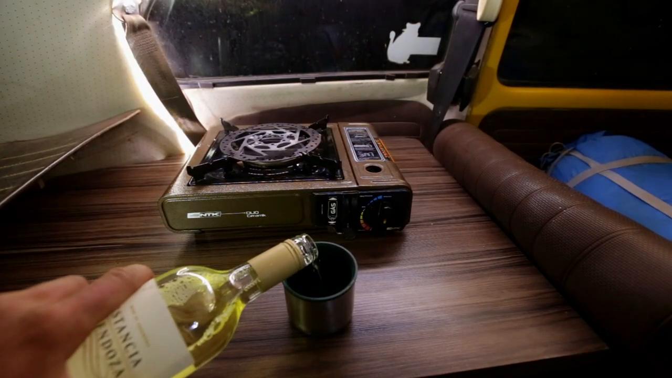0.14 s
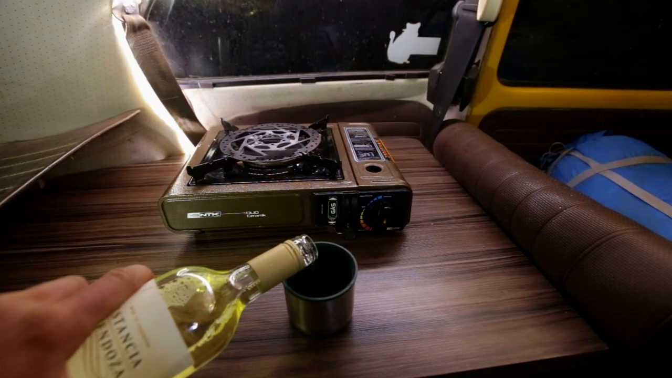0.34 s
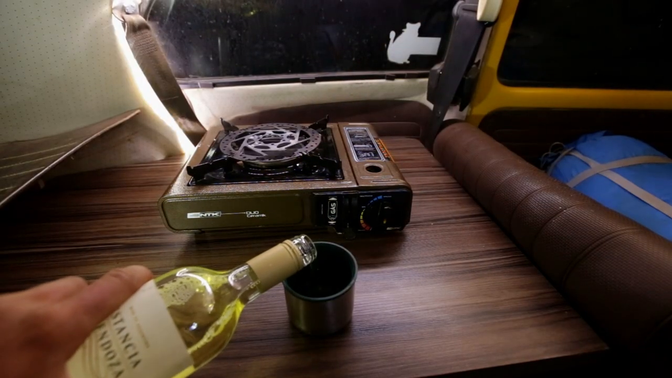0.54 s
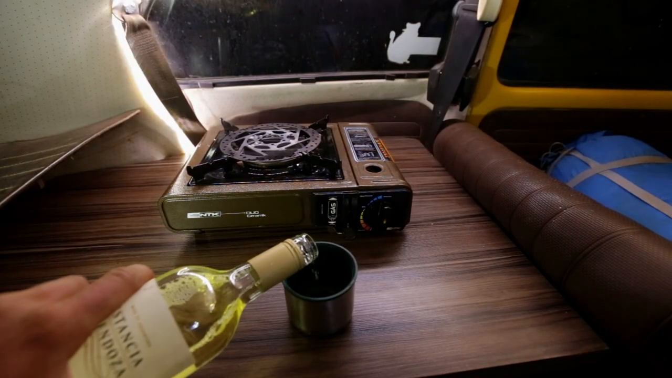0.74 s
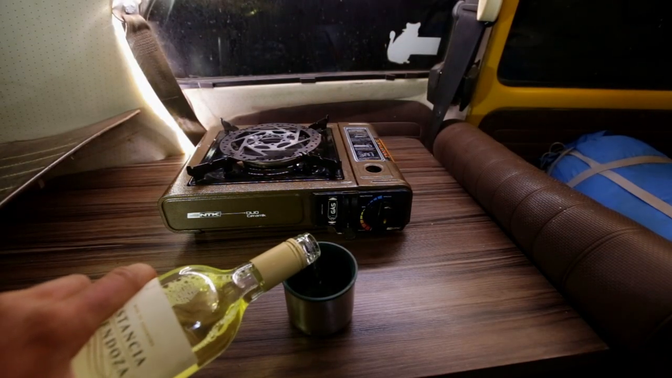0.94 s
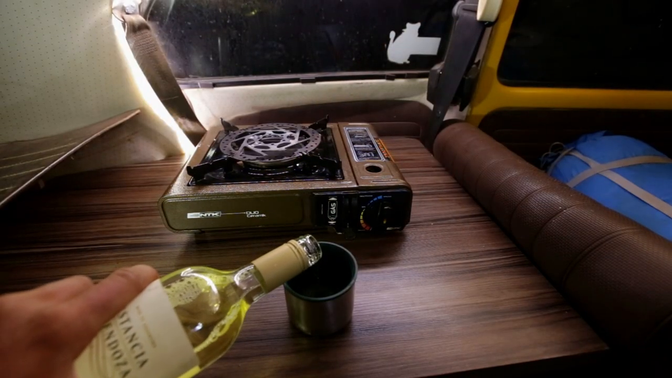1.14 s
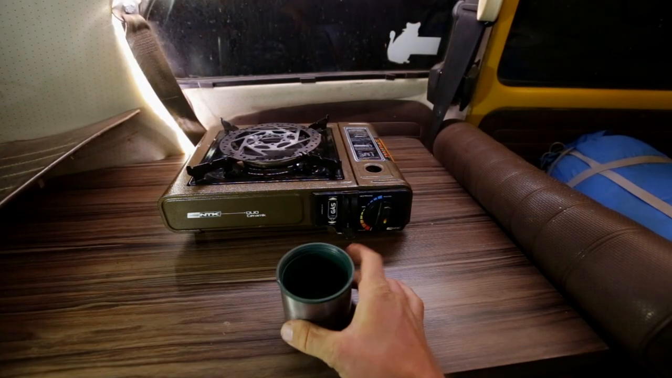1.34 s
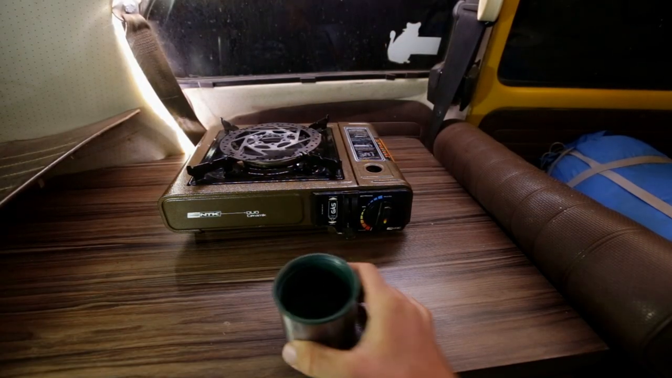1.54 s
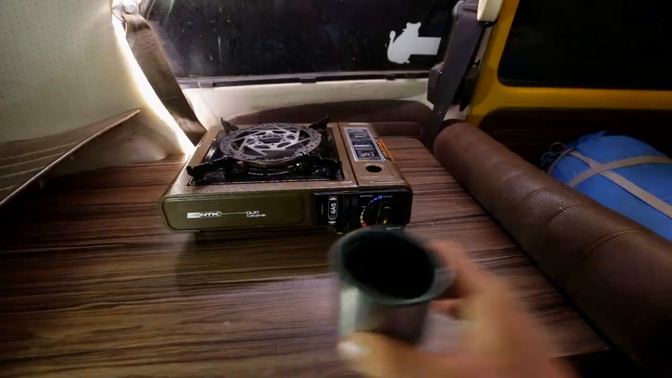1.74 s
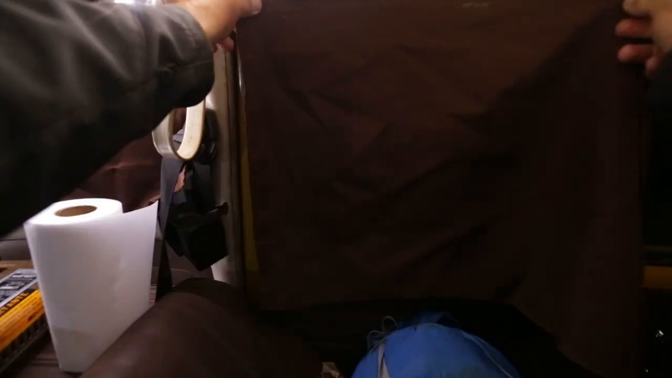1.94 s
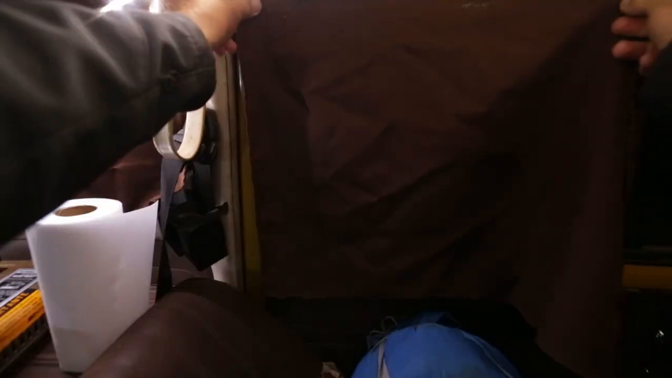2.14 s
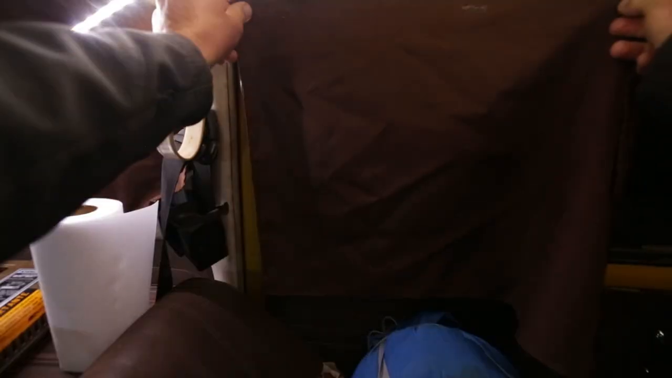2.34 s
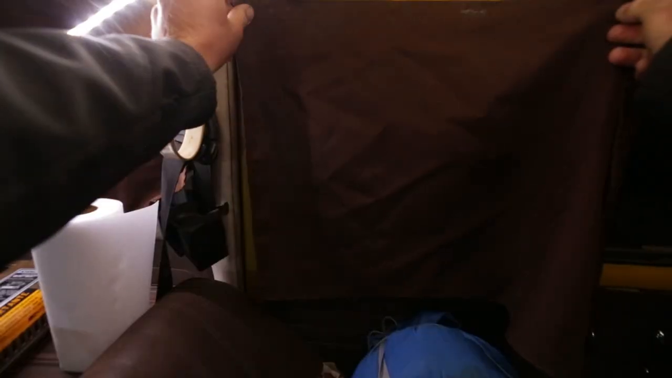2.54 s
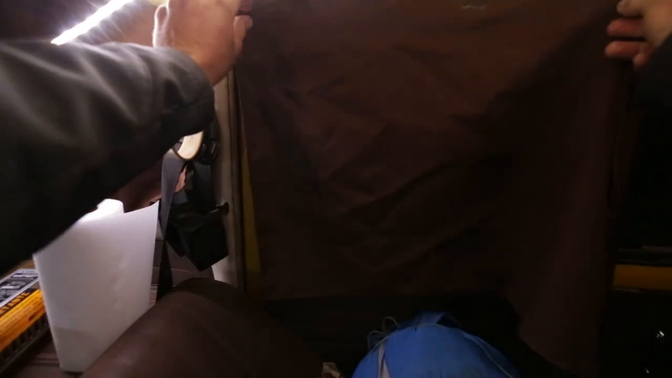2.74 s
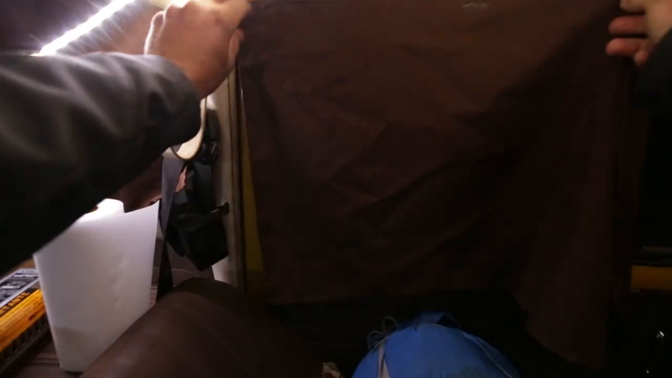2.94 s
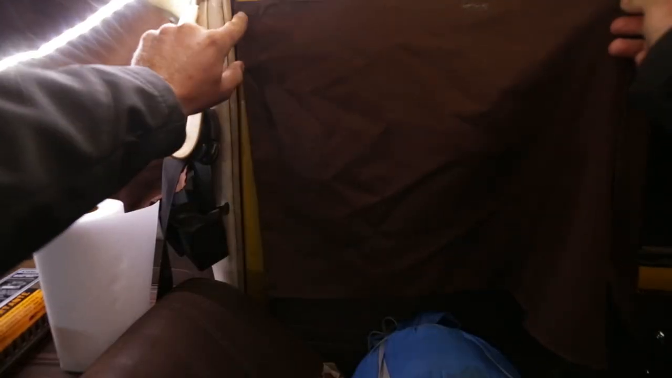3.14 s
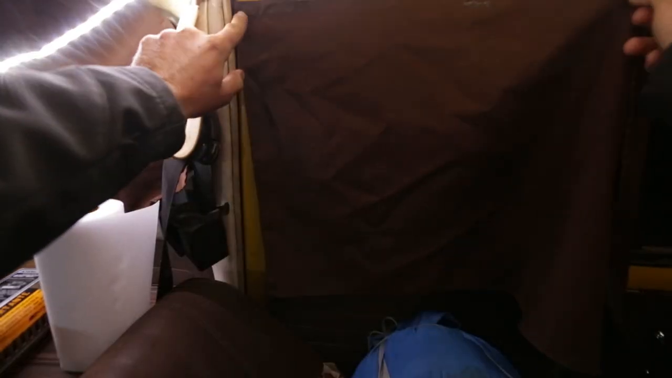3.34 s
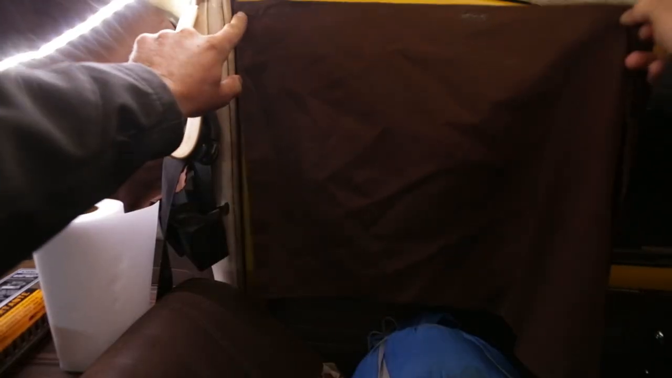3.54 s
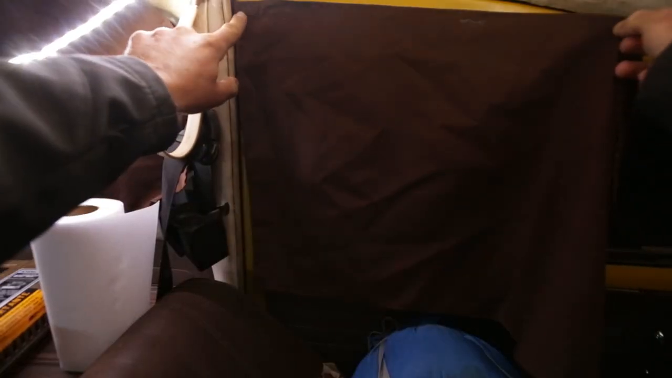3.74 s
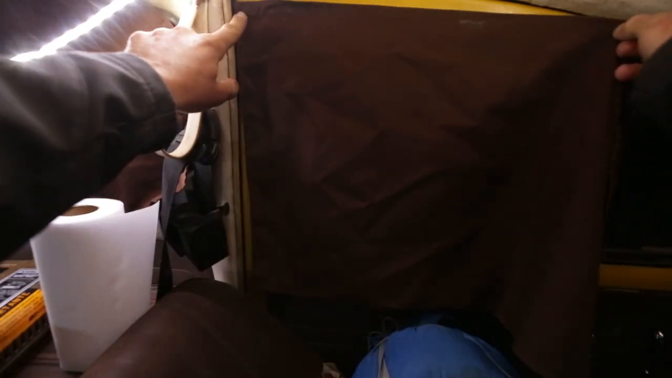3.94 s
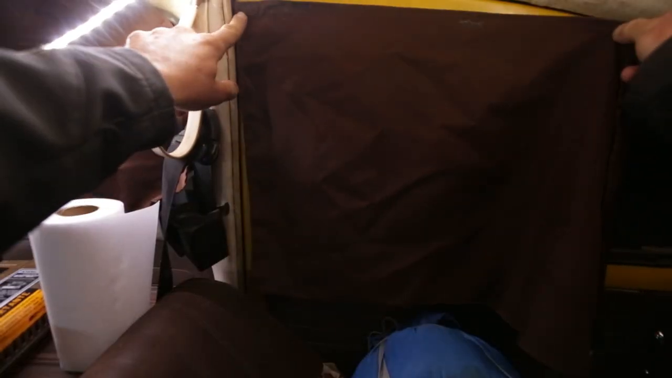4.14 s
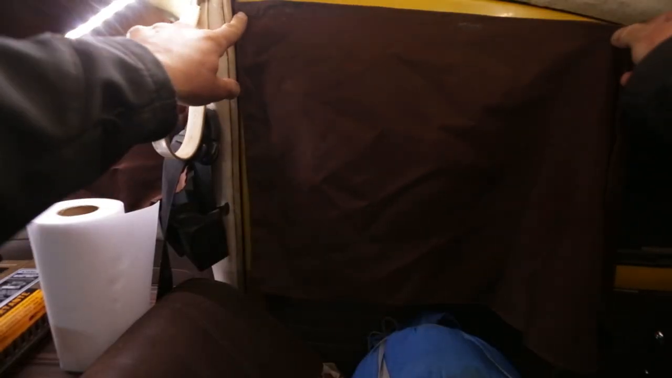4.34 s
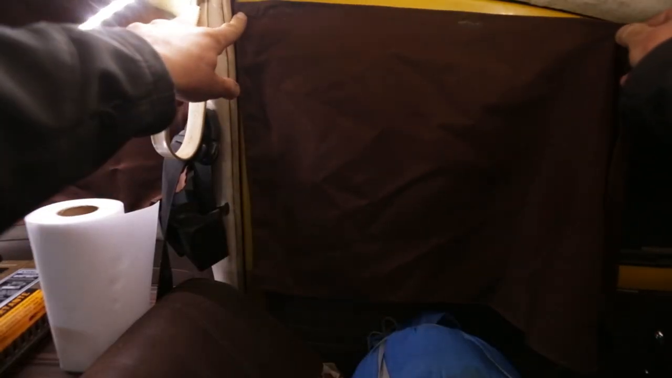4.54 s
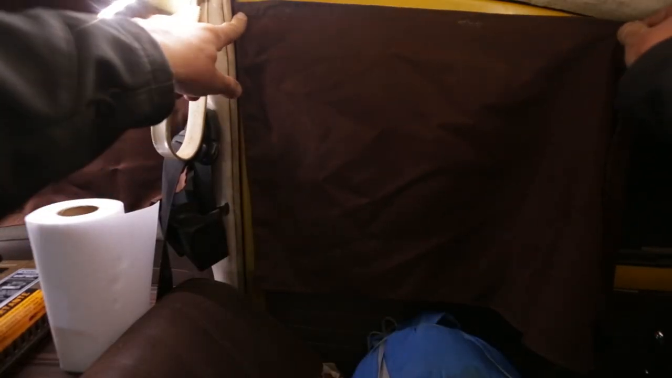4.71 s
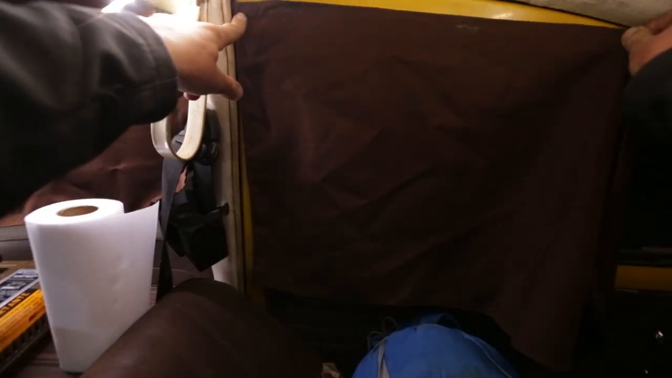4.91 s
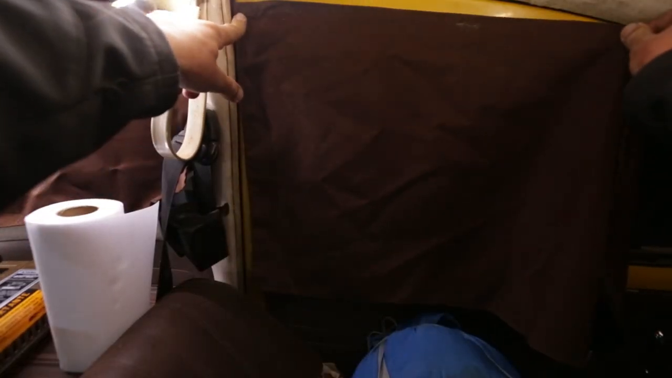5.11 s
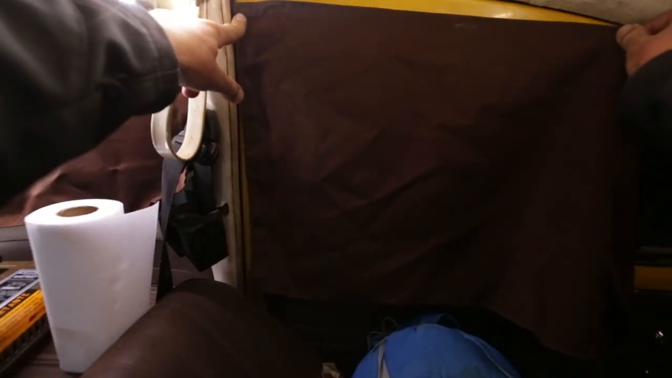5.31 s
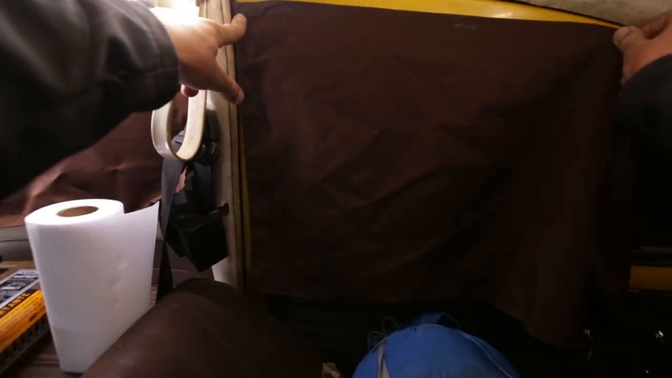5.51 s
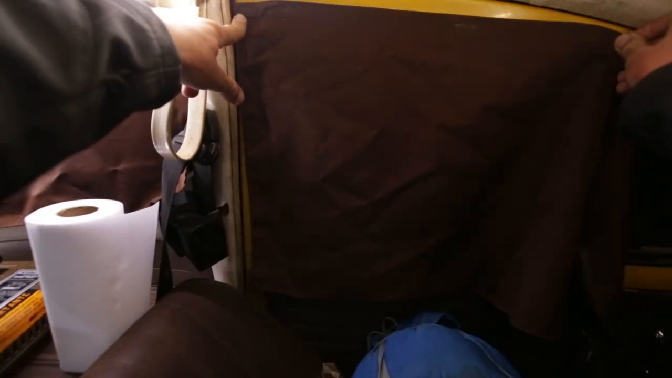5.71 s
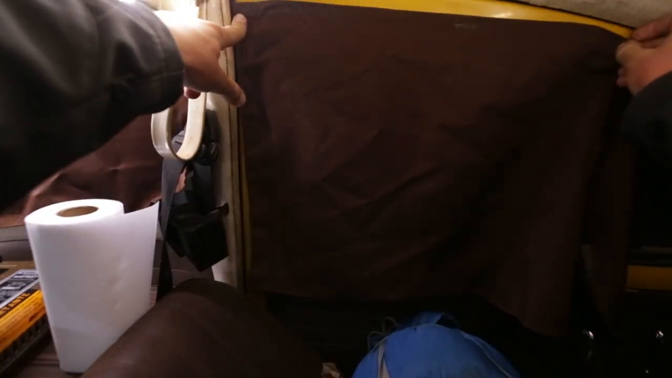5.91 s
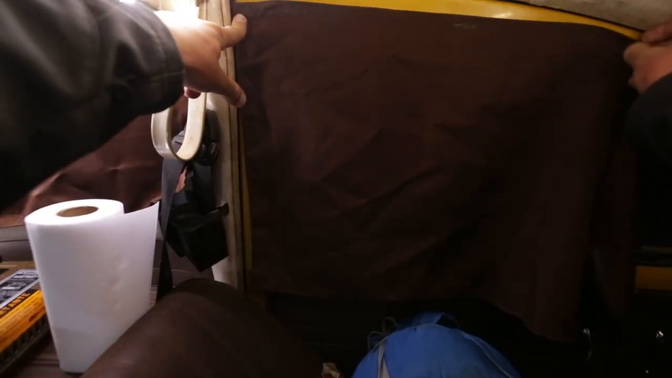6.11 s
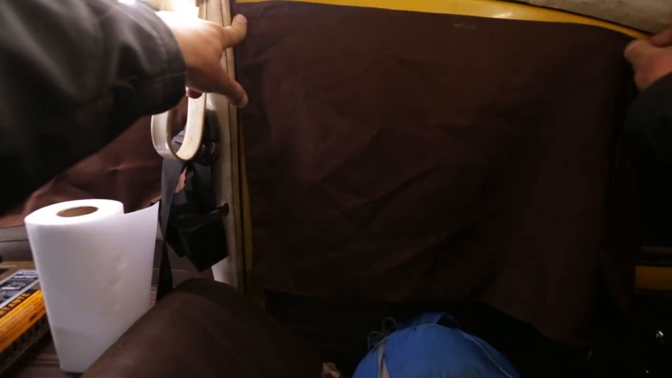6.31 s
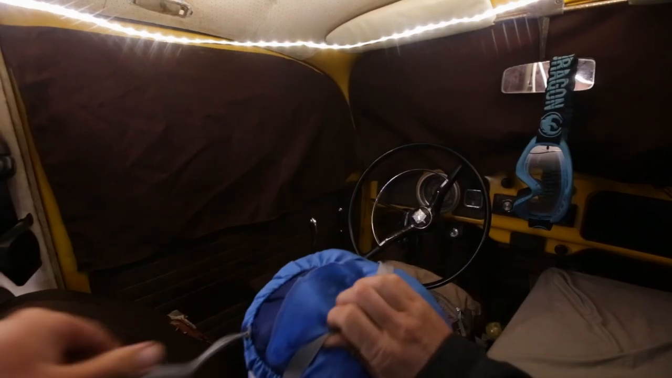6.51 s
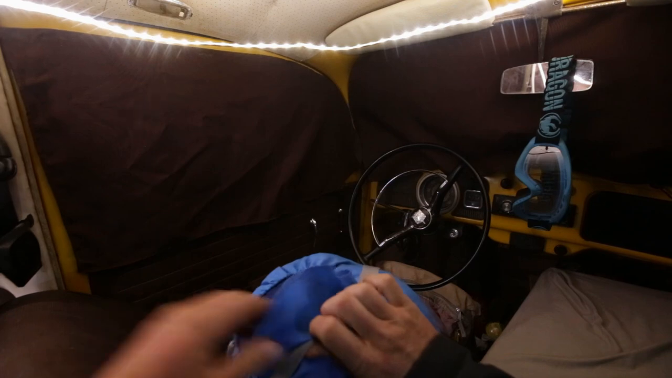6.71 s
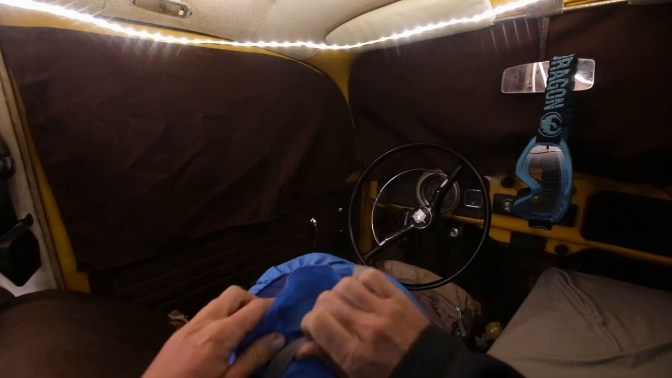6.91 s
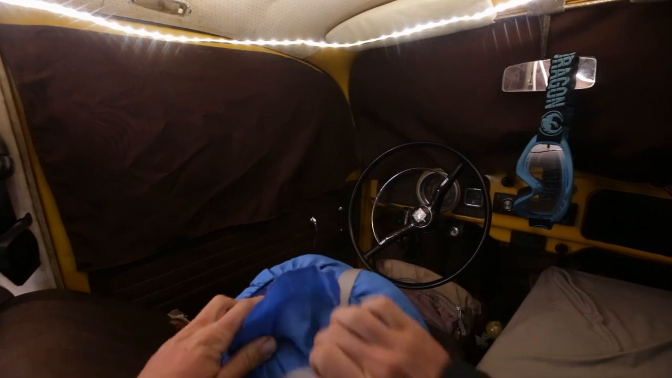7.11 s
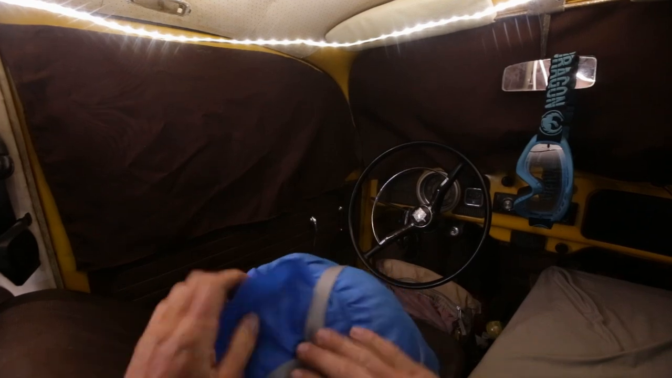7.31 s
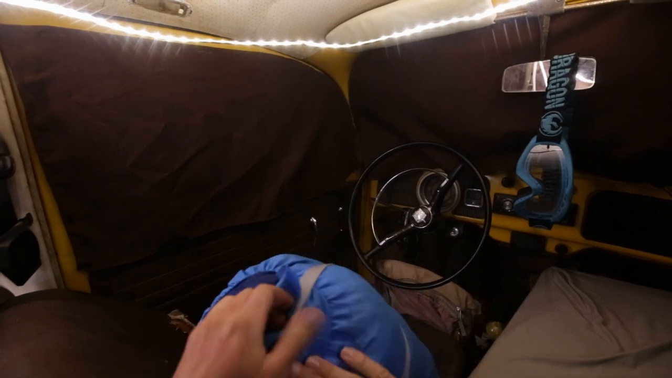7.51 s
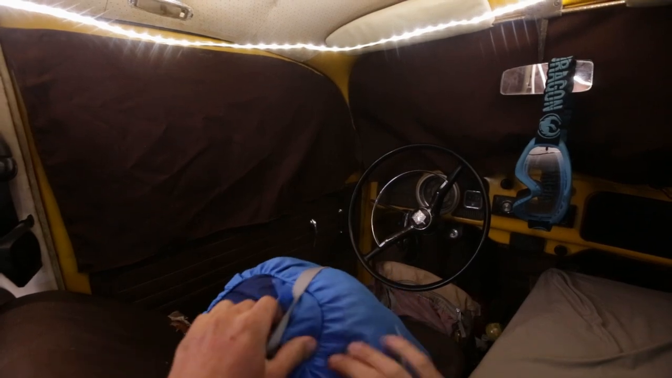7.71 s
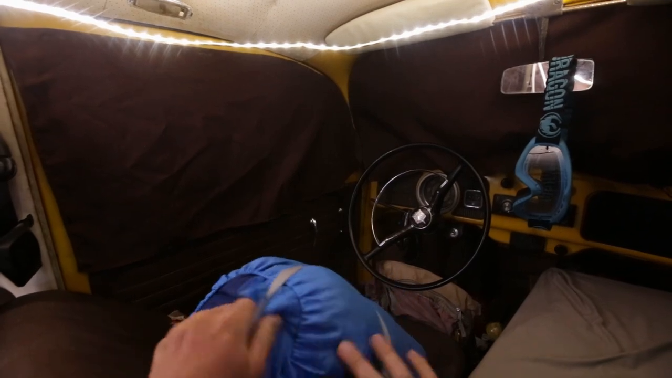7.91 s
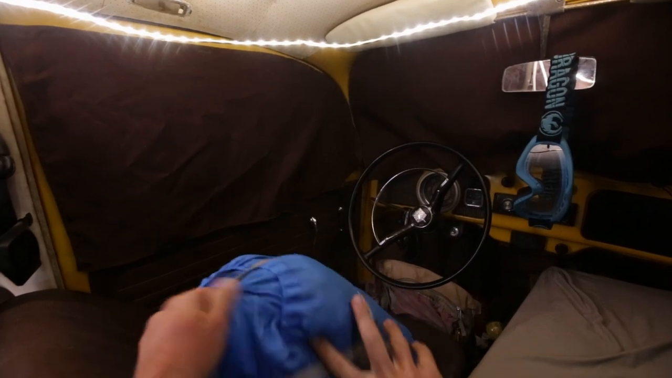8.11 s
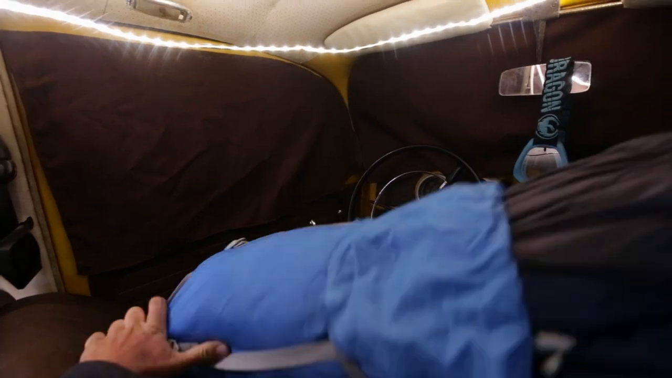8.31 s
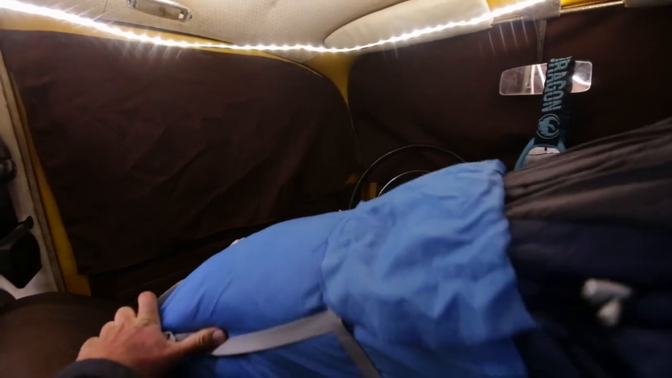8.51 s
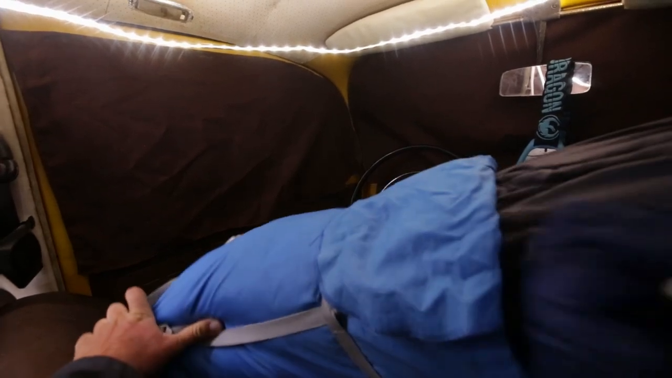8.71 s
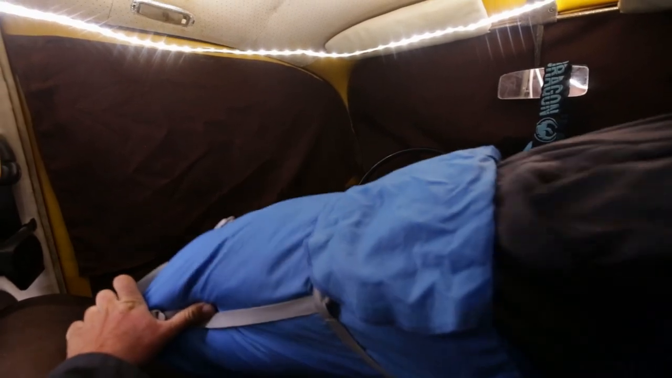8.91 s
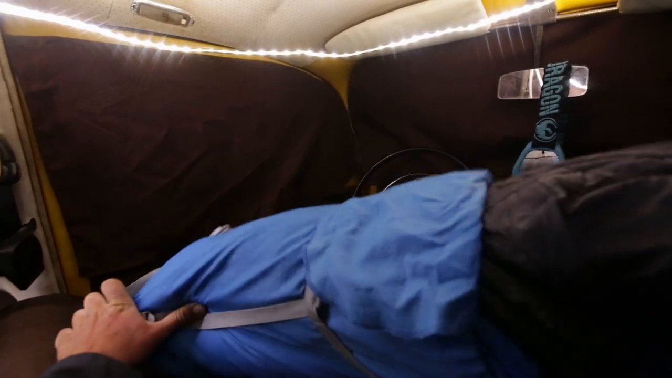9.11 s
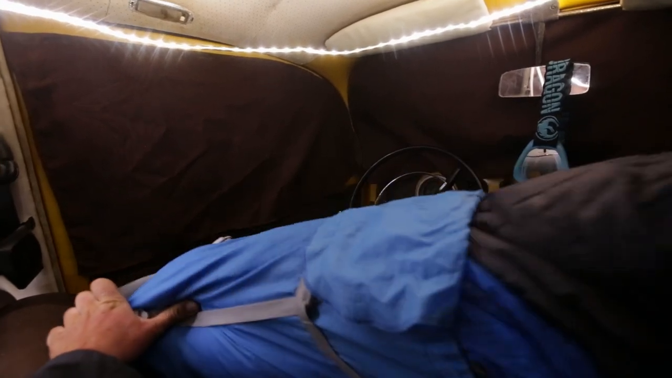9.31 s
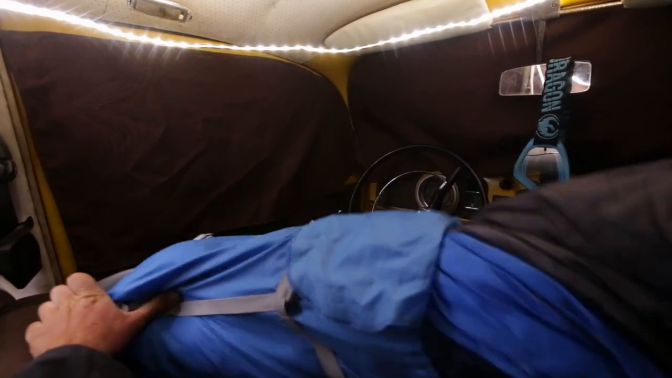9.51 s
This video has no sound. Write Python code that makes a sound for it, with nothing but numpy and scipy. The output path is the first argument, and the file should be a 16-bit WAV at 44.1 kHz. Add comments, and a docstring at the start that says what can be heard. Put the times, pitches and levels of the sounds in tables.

```python
"""Wine, curtain and sleeping bag in a parked car.

The last of a bottle of wine dribbles into a metal cup, ringing it and trapping bubbles; the cup slides
over a table. A cloth curtain is hung with magnets that snap onto the steel body, amid bumps and squeaks.
A sleeping bag rustles out of its nylon sack. The small padded cabin adds close reflections and a short,
low tail, over faint rumble and microphone hiss."""
import sys
import numpy as np
from scipy import signal
from scipy.fft import rfft, irfft, next_fast_len
from scipy.io import wavfile
from scipy.ndimage import uniform_filter1d

SR = 44100
rng = np.random.default_rng(int(sys.argv[2]) if len(sys.argv) > 2 else 0)


def digitize_waveform(pressure):
    """Quantize a signal to 16-bit integers and store it at the path in sys.argv[1].

    Rows of a 2-D input are taken as channels; values are limited to [-1, 1].
    """
    field = np.atleast_2d(pressure).T
    bounded = np.clip(field, -1, 1)
    quanta = np.round(bounded * 32767).astype(np.int16)
    wavfile.write(sys.argv[1], SR, quanta)


N = 421155
TIME_S = np.arange(N) / SR
RING_S = np.arange(SR // 2) / SR  # time since an onset

# Larger drops. Each row: start in seconds, impact in dB, bubble in Hz, bubble in dB, cup air in dB.
DROPS = [(0.027, -66, 3660, -57, -59), (0.08, -66, 2520, -61, -74), (0.095, -66, 2910, -57, -73),
         (0.168, -59, 2930, -56, -59), (0.212, -50, 965, -56.5, -62), (0.3, -49, 2600, -55, -48.5),
         (0.339, -56, 3820, -51.5, -51), (0.356, -45.5, 3200, -54, -55), (0.391, -70, 3600, -54, -64),
         (0.408, -50.5, 2120, -53, -42.5), (0.442, -63, 2840, -52.5, -63), (0.458, -53, 2040, -60, -53),
         (0.487, -58, 2540, -55, -64), (0.526, -55.5, 2650, -63, -54), (0.55, -56, 2300, -55.5, -50),
         (0.651, -51, 2450, -50.5, -47), (0.858, -57, 2710, -56.5, -60), (0.877, -55.5, 1940, -61, -48),
         (0.889, -51, 2390, -58.5, -47), (0.932, -64, 1940, -55.5, -61), (0.986, -61, 1500, -64, -58),
         (1.007, -58, 2340, -62, -64), (1.066, -54.5, 1840, -73, -57), (1.194, -58, 1830, -64, -52),
         (1.209, -61, 2350, -60, -50.5), (1.232, -64, 2650, -68, -55), (1.244, -62, 1960, -60, -56)]
# Magnets meeting steel. Each row: start in seconds, level in dB, hardness 0-1, struck spot in Hz,
# its share in dB, ping in Hz, its share in dB.
MAGNET_HITS = [(1.9027, -37.5, .15, 880, -0.5, 2450, -18.5), (1.9171, -17, 0.4, 671, 1, 2470, -4),
               (3.8615, -44.5, .75, 930, 2, 2984, 5), (3.8752, -40, .85, 1020, 1, 2410, 7),
               (3.8859, -21.5, 0.99, 634, 0, 5070, 2.5), (5.2749, -36.5, 0.45, 990, -8, 4500, -14),
               (5.279, -27.5, 0.08, 970, 3.5, 1550, -17.5), (5.3143, -33.5, .75, 905, -6, 3900, -14.5),
               (5.317, -22.5, 0, 900, 10.5, 1570, -12)]
# Hands on trim and bag, folds snapping. Each row: start in seconds, then tap, thud and tick in dB.
BUMPS = [(2.207, -53, -45.5, -78), (2.458, -51, -80, -53), (2.781, -55, -54, -37), (2.889, -61, -78, -53.5),
         (4.155, -44.5, -42.5, -49), (4.76, -64, -82, -49), (4.832, -51.5, -84, -48),
         (5.469, -70, -56, -75), (5.678, -48.5, -76, -52), (5.887, -45.5, -79, -75),
         (6.04, -54.5, -80, -55.5), (6.309, -46, -71, -54), (6.331, -40, -56, -41.5),
         (6.356, -50, -62, -43), (6.381, -36.5, -70, -38), (6.459, -46, -42, -48.5), (6.564, -46, -59, -47),
         (6.68, -34, -39.5, -44.5), (6.698, -33, -52, -52), (6.811, -39, -48, -61),
         (6.914, -41.5, -58, -57), (6.947, -44, -54, -39.5), (7.116, -47, -65, -46), (7.431, -47, -57, -59),
         (7.578, -45.5, -54, -62), (7.946, -67, -58, -47), (8.199, -36.5, -48, -36.5),
         (8.349, -37, -58, -50)]
# Squeaking rubs. Each row: start in seconds, level in dB, pitch in Hz, roughness 0-1.
SQUEAKS = [(2.423, -46.5, 1096, 0.14), (6.610, -50.5, 840, 0.4), (6.626, -48.5, 800, 0.65),
           (6.911, -51, 763, 0.51)]
# Tension of the sack. Each row: time in seconds, tautness 0-1.
SACK_TENSION = [(7.6, 0), (8.15, 0.13), (8.35, 0.74)]
# One long pull of the bag. Each row: time in seconds, rustle in dB, fizz in dB.
BAG_PULL = [(8.26, -48, -71), (8.36, -41, -66), (8.6, -43, -68), (8.64, -41, -64), (8.758, -44, -83),
            (8.916, -41, -66), (9.208, -42.5, -69), (9.488, -39, -58), (9.55, -39.5, -62)]

# Movements. Each row: start in seconds, length in seconds, relative level in dB, swell in dB.
TRICKLE_SPURTS = [(0, 0.15, -63, 4), (.25, 0.3, -65.5, -13), (.52, 0.19, -72, 11), (.83, 0.25, -68.5, 3),
                  (1.17, 0.16, -66.5, -3)]
CUP_PUSHES = [(1.305, .11, -59.5, -9), (1.462, 0.083, -52.5, -4)]
BODY_BOOMS = [(2.2, 0.013, -51, -7), (2.785, 0.14, -68.5, -18), (3.04, .02, -65.5, -4),
              (3.14, .15, -80, -8), (5.3, 0.029, -57, -7), (6.31, 0.09, -54.5, 6)]
CURTAIN_STROKES = [(2.21, 0.16, -71, -8), (2.38, 0.26, -71.5, -3.5), (2.72, 0.16, -67, 0),
                   (3.11, 0.16, -69, -11.5), (4.41, 0.044, -73, 0), (4.52, .07, -74, -6),
                   (4.75, 0.091, -67, 3), (5.69, 0.34, -71.5, -0.5), (6.06, 0.076, -65.5, 2)]
SACK_STROKES = [(6.21, .15, -58, 18), (6.42, 0.1, -61, -6), (6.54, 0.059, -57, -2), (6.625, .05, -54.5, -3),
                (6.72, 0.069, -56, 13.5), (6.83, 0.15, -53.5, 0), (7.0, 0.22, -49, 3.5),
                (7.27, 0.11, -53, 8), (7.415, 0.12, -53, -10.5), (7.545, 0.044, -51.5, -2.5),
                (7.63, .14, -53, 13), (7.78, .15, -52.5, 0), (7.935, 0.27, -51, -4.5), (8.18, .14, -49, -3)]  # hands working the sack open
BAG_CATCHES = [(8.31, 0.047, -54, -11), (8.64, 0.029, -56, -1), (9.0, .07, -57, -14),
               (9.225, 0.027, -55, 16)]  # bag catching in the sack's mouth

# Resonances. Each row: frequency in Hz, width in Hz, level in dB.
CUP_MODES = [(185.6, 10, 4.5), (219.4, 15, 1), (541, 32, 2.5), (728, 32, -8), (930, 30, -6.5),
             (1430, 200, -4.5), (1900, 35, -30), (2330, 250, -15), (2600, 69, -22), (3320, 130, -14),
             (3690, 60, -13)]  # cup and table
STEEL_MODES = [(615, 81, 0), (970, 110, 0.5), (1180, 70, -3.5), (1350, 90, -5), (1590, 78, -6.5),
               (1830, 15, -19), (2140, 60, -10.5), (2300, 70, -9), (2490, 65, -4.5), (2990, 44, -18),
               (3360, 120, -11), (3980, 68, -18.5), (4280, 100, -19), (5130, 150, -23.5), (6090, 91, -27.5),
               (6630, 180, -31), (8296, 110, -28), (10600, 110, -28.5)]
# Slow ring of the wide panels. Each row: frequency in Hz, level in dB, T60 in seconds.
PANEL_MODES = [(241, -12.5, 0.27), (330, -7.5, 0.37), (386, -1.5, .24), (450, -7.5, .24), (484, -6.5, 0.24),
               (538, -7, 0.12), (598, -4.5, .16), (689, -4.5, .14), (824, -8.5, .17), (887, -8, 0.18),
               (1010, -9, .14)]
# Cabin decay. Each row: frequency in Hz, T60 in seconds.
CABIN_T60_S = [(100, .25), (300, .26), (420, 0.17), (700, 0.16), (1800, 0.066), (5000, 0.024),
               (15000, 0.18)]

# Spectra. Each row: frequency in Hz, relative level in dB.
FLOOR_MID_SPECTRUM = [(12, -30), (20, -9.5), (148, -17.5), (185, -12), (225, -17), (342, -20), (372, -17),
                      (597, -18), (788, -16), (1230, -19), (2400, -21), (2610, -21), (6190, -25),
                      (15500, -25.5)]  # air and hiss common to both sides
FLOOR_SIDE_SPECTRUM = [(20, 0.5), (100, -3.5), (300, -7.5), (700, -10), (1500, -14.5), (4000, -11),
                       (9000, -10.5), (15500, -9.5)]  # the part that differs between sides
SPRAY_SPECTRUM = [(1200, 3), (1700, 4), (1950, 0), (2800, 10), (3700, -1), (4300, -17), (5300, -1),
                  (6500, -12)]
SLIDE_SPECTRUM = [(65, -55), (110, -32), (199, 3), (366, -20), (553, -4), (649, -22), (777, -13.5),
                  (1020, -9), (1090, -32), (1310, -4), (1650, -32), (1940, -19), (3510, -22), (8000, -40),
                  (10400, -60), (17600, -120)]
CRACK_SPECTRUM = [(150, -16.5), (500, -4.5), (1200, 4.5), (1900, -6.5), (2600, -4.5), (5200, -14.5),
                  (6500, -18), (11000, -21.5), (16000, -26.5)]
BOOM_SPECTRUM = [(25, -5), (50, -13), (90, -3.5), (122, 11), (160, -12.5), (260, -5)]
CURTAIN_SPECTRUM = [(59, -35.5), (100, -5), (453, -9.5), (973, -4), (1270, -12), (2410, -7), (3380, -12.5),
                    (4030, -16), (4490, -23), (7000, -22), (9100, -31), (15400, -120)]
SLACK_SPECTRUM = [(600, -6.5), (770, -1), (950, 4), (1350, -0.5), (2400, 0), (3300, -1), (4300, -13),
                  (5100, -7.5), (5800, -19), (6500, -14), (7300, -25), (9000, -27.5)]  # slack nylon: hollow
TAUT_SPECTRUM = [(600, -7.5), (800, -2.5), (1050, -2.5), (1300, -2), (2450, -2.5), (3300, -6.5),
                 (4300, -10), (5500, -14.5), (7000, -21.5), (9000, -28)]  # taut nylon: even
HUM_SPECTRUM = [(50, -34), (90, -14), (125, -8.5), (160, -10.5), (250, -8), (330, -6), (440, 0.5),
                (560, -0.5), (720, -17), (1000, -37)]
FIZZ_SPECTRUM = [(5000, -19), (7500, -2), (10000, -9), (12500, -5), (16000, -13)]


def undb(db):
    """Decibels to gain."""
    return 10 ** (np.asarray(db) / 20)


def unit(x):
    """Scale to rms 1."""
    return x / np.sqrt(np.mean(x ** 2))


def blow(x):
    """Scale a short sound to the energy of 10 ms at rms 1."""
    return x / np.sqrt(np.sum(x ** 2) / (SR / 100))


def curve(table, column):
    """Gain from a dB column: silent before the first row, falling 100 dB/s after the last."""
    rows = np.array(table)
    fall_db = np.maximum(TIME_S - rows[-1, 0], 0) * 100
    return undb(np.interp(TIME_S, rows[:, 0], rows[:, column], left=-np.inf) - fall_db)


def over_hz(hz, points):
    """Interpolate (Hz, value) points on a log frequency axis."""
    points_hz, values = np.transpose(points)
    return np.interp(np.log(hz + 1e-9), np.log(points_hz), values)


def colour(x, spectrum):
    """Filter by a spectrum, rolled off beyond its ends; rms 1."""
    size = next_fast_len(len(x))
    hz = np.arange(size // 2 + 1) * SR / size + 0.0015
    low_cut = 1 + (spectrum[0][0] / hz / 1.15) ** 12
    high_cut = 1 + (hz / spectrum[-1][0] / 1.15) ** 12
    gain = undb(over_hz(hz, spectrum)) / np.sqrt(low_cut * high_cut)
    return unit(irfft(rfft(x, size) * gain, size)[:len(x)])


def band(x, low_hz, high_hz, order=2):
    """Causal band-pass."""
    edges_hz = [low_hz, min(high_hz, .48 * SR)]
    return signal.sosfilt(signal.butter(order, edges_hz, "band", fs=SR, output="sos"), x)


def fade(t60_s):
    """Decay by 60 dB in t60_s."""
    return np.exp(-np.log(1000) * RING_S / t60_s)


def noise():
    """Half a second of white noise."""
    return rng.standard_normal(len(RING_S))


def sine(hz, phase_turns=0):
    """Half a second of steady tone."""
    return np.sin(2 * np.pi * (hz * RING_S + phase_turns))


def modes(table):
    """Struck resonances, neighbours in opposite sign."""
    return blow(sum((-1) ** k * undb(db) * width_hz * np.exp(-np.pi * width_hz * RING_S) * sine(hz)
                    for k, (hz, width_hz, db) in enumerate(table)))


def add(out, start_s, sound):
    """Mix a sound in at start_s."""
    start = max(int(start_s * SR), 0)
    out[start:start + len(sound)] += sound[:max(N - start, 0)]


def grains(per_s, spread_db):
    """Dense random impulses of uneven size; rms 1."""
    size = undb(spread_db * np.minimum(rng.exponential(size=N), 5))
    return unit((rng.random(N) < per_s / SR) * size * rng.standard_normal(N))


def waver(per_s, depth_db):
    """Randomly wandering gain."""
    hold = int(SR / per_s)
    steps = np.repeat(rng.standard_normal(N // hold + 1), hold)
    return undb(depth_db * uniform_filter1d(steps, hold)[:N])


def strokes(table, attack_s, release_s):
    """Gain of separate movements: each sets in, swells or eases, and dies away."""
    power = np.zeros(N)
    for start_s, length_s, db, swell_db in table:
        progress = np.minimum(RING_S / length_s, 1)
        attack = np.minimum(RING_S / attack_s, 1)
        release = np.exp(-np.maximum(RING_S - length_s, 0) / release_s)
        add(power, start_s, (undb(db + swell_db * (progress - .5)) * attack * release) ** 2)
    return np.sqrt(power)


def noise_floor():
    """Faint air rumble and microphone hiss, in stereo."""
    mid = undb(-67.5) * colour(rng.standard_normal(N), FLOOR_MID_SPECTRUM)
    side = undb(-70.5) * colour(rng.standard_normal(N), FLOOR_SIDE_SPECTRUM)
    return np.array([mid + side, mid - side])


def bubble(hz, cycles, rise):
    """A trapped bubble rings briefly, rising in pitch as it nears the surface."""
    life_s = cycles / hz
    pitch_hz = hz * (1 + rise * np.minimum(RING_S / life_s - .15, 1))
    return blow(np.sin(2 * np.pi * np.cumsum(pitch_hz) / SR) * fade(life_s))


def wine_trickle(pour_s=1.3, bubble_count=110):
    """Fine spurts tick with spray and tiny bubbles and keep the cup ringing."""
    bubbles = np.zeros(N)
    for when, pitch, faintness in rng.random((bubble_count, 3)):
        hz = 1900 * 2.9 ** (pitch ** 1.5)
        add(bubbles, when * pour_s, undb(-12 * faintness) * bubble(hz, cycles=50, rise=.1))
    spray = colour(grains(per_s=600, spread_db=5.5), SPRAY_SPECTRUM)
    ring = unit(signal.oaconvolve(grains(per_s=400, spread_db=3), modes(CUP_MODES))[:N])
    flow = strokes(TRICKLE_SPURTS, attack_s=0.028, release_s=0.078)
    return (undb(-3.5) * bubbles + undb(-1.5) * spray + undb(-10) * ring) * flow


def wine_drops(cup_air_hz=1280):
    """Each drop slaps the surface, rings the cup and its air, and traps a bubble."""
    out = np.zeros(N)
    for start_s, impact_db, bubble_hz, bubble_db, air_db in DROPS:
        # each landing point favours other modes
        cup = modes([(hz, width_hz, db + 2 * rng.standard_normal()) for hz, width_hz, db in CUP_MODES])
        splash = blow(band(noise() * fade(0.02), 480, 1900))
        air = blow(sine(cup_air_hz * (1 + 0.024 * rng.standard_normal())) * fade(0.065))
        slap = blow(band(noise() * fade(0.018), 1100, 2800))
        plink = bubble(bubble_hz, cycles=70, rise=.08) + undb(-6) * slap
        impact = undb(impact_db - 2.5) * (cup + undb(-9) * splash)
        add(out, start_s, impact + undb(air_db - 3.5) * air + undb(bubble_db - 3) * plink)
    return out


def cup_slide():
    """The cup's base sticks and slips on the wood."""
    scrape = colour(grains(per_s=1500, spread_db=0.5), SLIDE_SPECTRUM)
    return scrape * strokes(CUP_PUSHES, attack_s=0.025, release_s=0.021)


def magnets():
    """A magnet cracks on steel and pings; the spot rings, the trim thumps, the wide panels ring on."""
    out = np.zeros(N)
    steel = modes(STEEL_MODES)
    for start_s, db, hardness, spot_hz, spot_db, ping_hz, ping_db in MAGNET_HITS:
        cutoff_hz = np.interp(hardness, (0, 1), (4100, 11000))
        crack_db = np.interp(hardness, (0, 1), (-5, 10.5))
        thump_db = np.interp(hardness, (0, 1), (-4.5, -13.5))
        swell_s = 0.0077 * (650 / spot_hz) ** 2.8  # stiffer spots peak sooner
        crack = blow(band(colour(noise(), CRACK_SPECTRUM) * fade(0.027), 450, 18000))
        spot = blow(sine(spot_hz) * RING_S ** 3 * np.exp(-3 * RING_S / swell_s))
        ping = blow(sine(ping_hz) * fade(0.015))
        thump = blow(band(noise() * (fade(0.12) - fade(0.014)), 270, 700, order=3))
        panels = blow(sum(undb(mode_db) * sine(hz, rng.random()) * fade(t60_s)
                          for hz, mode_db, t60_s in PANEL_MODES))
        snap = steel + undb(crack_db) * crack + undb(spot_db) * spot + undb(ping_db) * ping
        snap += undb(thump_db) * thump + undb(-12.5) * panels
        # thin steel radiates little bass; cloth under the magnet softens the contact
        add(out, start_s, undb(db) * blow(band(snap, 300, cutoff_hz, order=1)))
    return out


def body_boom():
    """Shifting weight or a landing magnet rocks the body; the cabin air booms."""
    rumble = colour(rng.standard_normal(N), BOOM_SPECTRUM)
    return rumble * strokes(BODY_BOOMS, attack_s=0.0069, release_s=0.014)


def bumps():
    """Hands knock and folds snap: a sharp tick, a short tap, a thud swelling just after."""
    out = np.zeros(N)
    for start_s, tap_db, thud_db, tick_db in BUMPS:
        thud = undb(thud_db - 3) * blow(band(noise() * (fade(0.13) - fade(0.0091)), 92, 460, order=3))
        tap = undb(tap_db - 7) * blow(band(noise() * fade(0.039), 390, 1260))
        tick = undb(tick_db - 8.5) * blow(band(noise() * fade(0.045), 1400, 4030))
        add(out, start_s, thud + tap + tick)
    return out


def curtain():
    """Heavy cloth brushes under the hands."""
    brush = undb(3) * colour(grains(per_s=5000, spread_db=2.0), CURTAIN_SPECTRUM)
    return brush * strokes(CURTAIN_STROKES, attack_s=0.024, release_s=0.059)


def squeaks(length_s=0.0228):
    """A brief note falls as a rub lets go; rougher rubs wander further."""
    out = np.zeros(N)
    for start_s, db, hz, roughness in SQUEAKS:
        progress = np.minimum(RING_S / length_s, 1)
        jitter = unit(band(noise(), 65, 420))
        pitch_hz = hz * (1 + roughness * (.5 - progress + .5 * jitter))
        note = np.sin(2 * np.pi * np.cumsum(pitch_hz) / SR)
        add(out, start_s, undb(db) * blow(np.sin(np.pi * progress) * note))
    return out


def nylon_sack():
    """Threads slip over each other, creases tick; the stuffed sack hums and fizzes when pulled."""
    taut = np.interp(TIME_S, *np.transpose(SACK_TENSION))
    handling = strokes(SACK_STROKES, attack_s=0.021, release_s=0.039)
    effort = np.maximum(handling, curve(BAG_PULL, column=1))
    creases = grains(per_s=800, spread_db=1.9) * undb(-9 - 8 * taut)
    slips = grains(per_s=16000, spread_db=-0.16) + creases
    rustle = (1 - taut) * colour(slips, SLACK_SPECTRUM) + taut * colour(slips, TAUT_SPECTRUM)
    rustle *= undb(0.23) * effort * waver(per_s=45, depth_db=0.86)
    catches = strokes(BAG_CATCHES, attack_s=0.018, release_s=0.014)
    hum_gain = undb(-10.5) * effort * waver(per_s=22, depth_db=0.84) + catches
    hum = colour(grains(per_s=2500, spread_db=2.0), HUM_SPECTRUM) * hum_gain
    fizz_gain = undb(-28.5) * effort * (1 - taut) + undb(-4.5) * curve(BAG_PULL, column=2)
    return rustle + hum + colour(slips, FIZZ_SPECTRUM) * fizz_gain


def cabin(x, early_db, tail_db):
    """Direct sound, reflections from close walls, and a tail that lasts longest in the bass."""
    early = band(noise(), 200, 9000, order=1) * fade(.035) * (RING_S > .002)
    octaves_hz = 62.5 * 2. ** np.arange(9)
    tail = sum(band(noise(), hz / np.sqrt(2), hz * np.sqrt(2), order=3) * fade(over_hz(hz, CABIN_T60_S))
               for hz in octaves_hz)
    response = undb(early_db) * early / np.linalg.norm(early)
    response += undb(tail_db) * tail / np.linalg.norm(tail)
    response[0] += 1  # direct path
    return signal.oaconvolve(x, response / np.linalg.norm(response))[:N]


def scene():
    """Mono sources through the cabin, over the stereo noise floor."""
    cup = cabin(wine_drops() + wine_trickle() + cup_slide(), early_db=-4, tail_db=-8.5)
    snaps = cabin(magnets(), early_db=-13.5, tail_db=-10.5)
    handling = bumps() + squeaks() + body_boom() + curtain() + nylon_sack()
    return cup + snaps + cabin(handling, early_db=-15, tail_db=-16) + noise_floor()


def record(dry):
    """The recorder's steep low-pass."""
    cutoff_hz = 15750
    return signal.sosfilt(signal.ellip(10, .1, 70, cutoff_hz, fs=SR, output="sos"), dry)


dry = scene()
out = record(dry)
digitize_waveform(out)
```